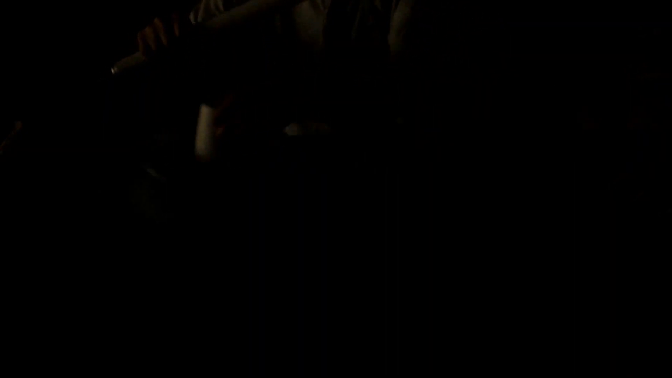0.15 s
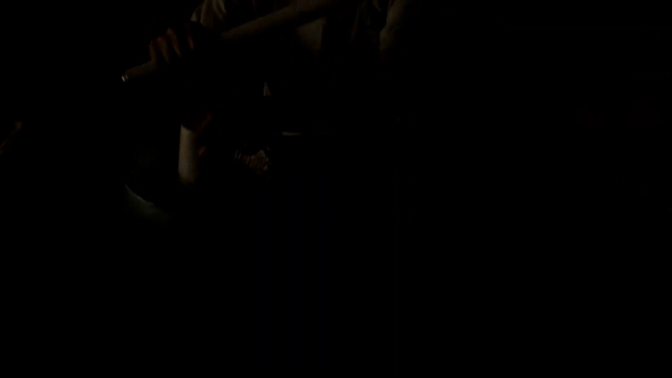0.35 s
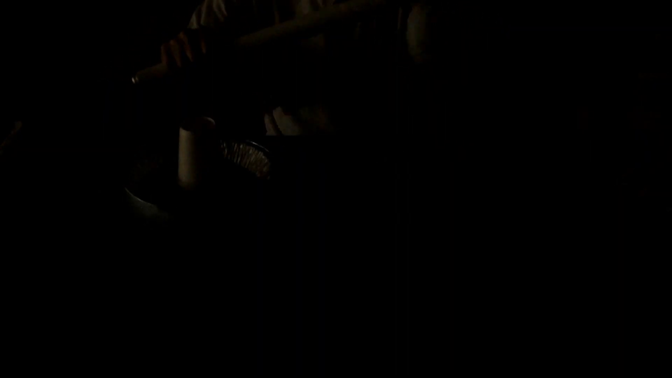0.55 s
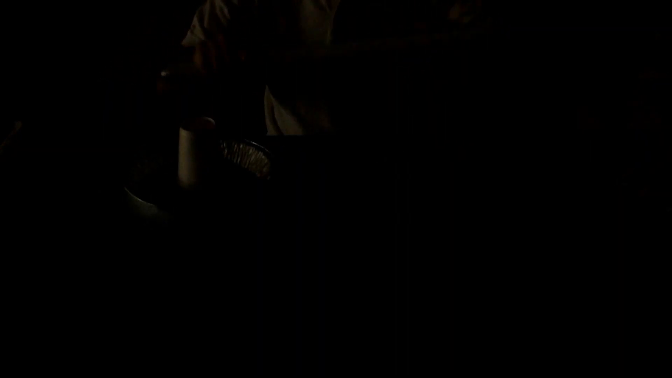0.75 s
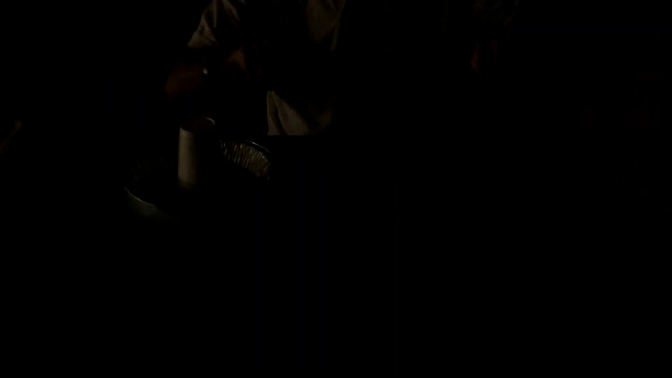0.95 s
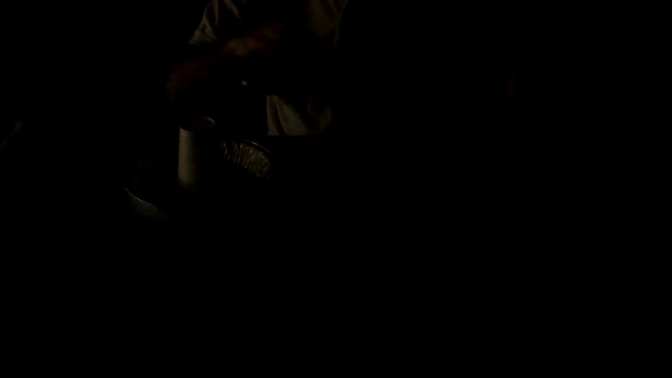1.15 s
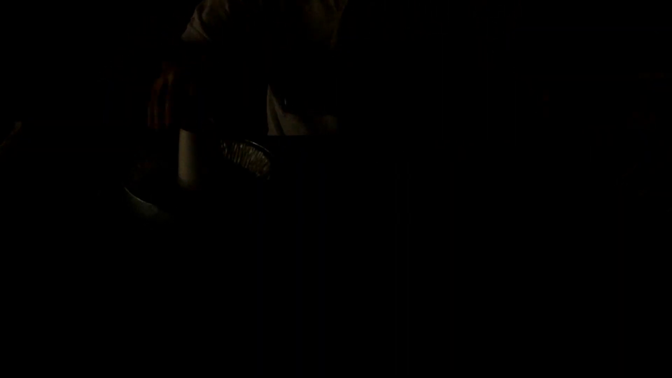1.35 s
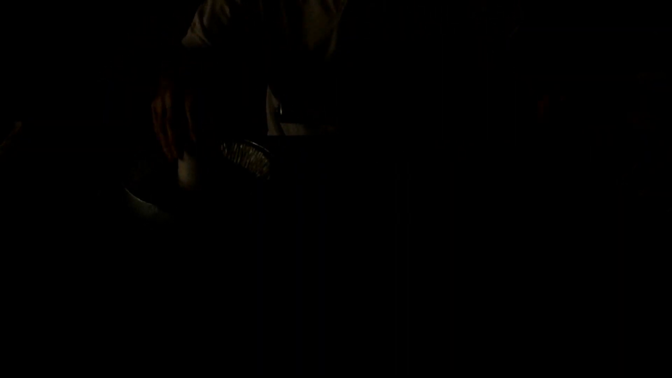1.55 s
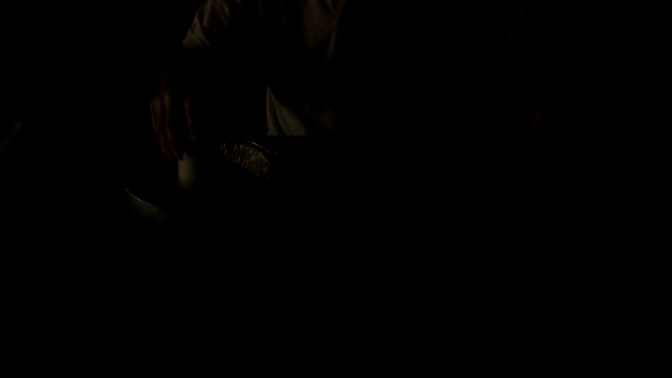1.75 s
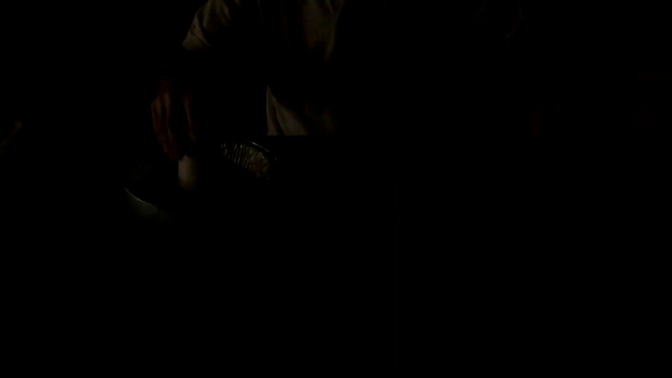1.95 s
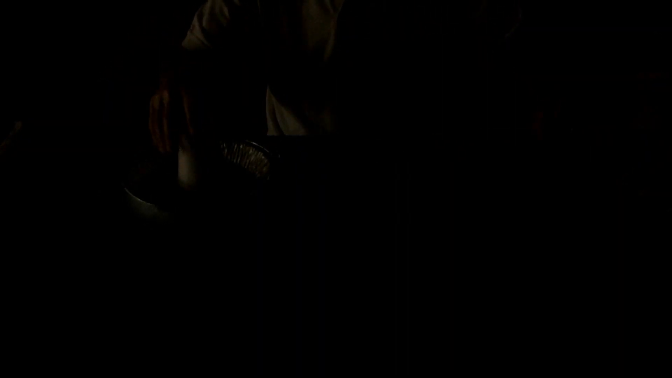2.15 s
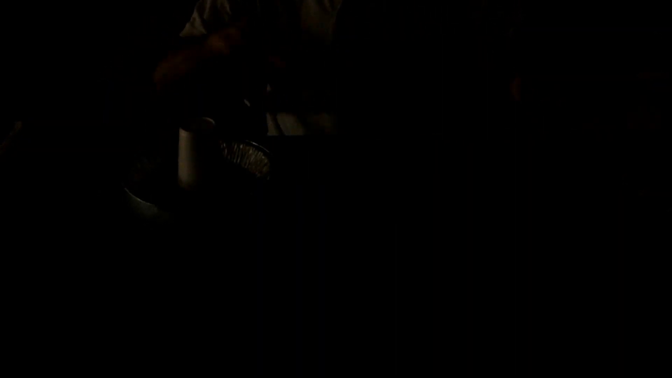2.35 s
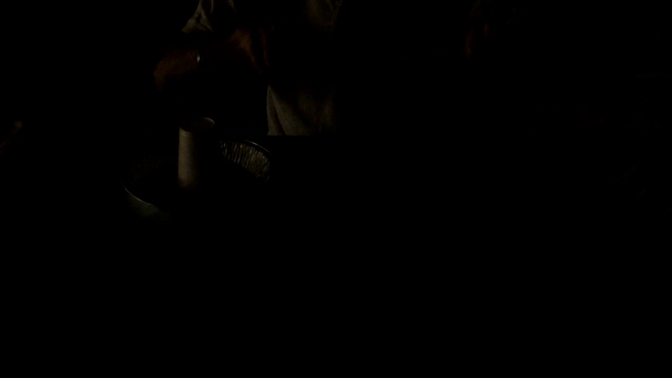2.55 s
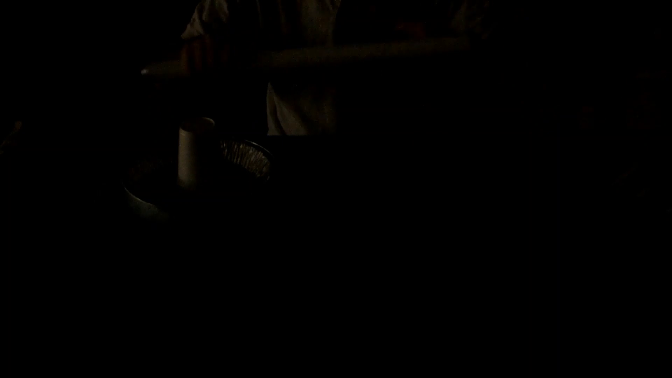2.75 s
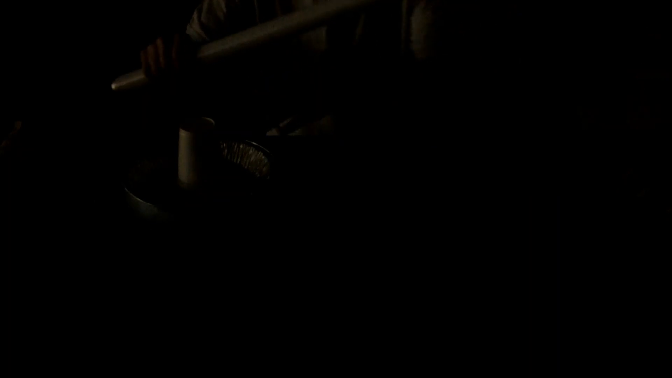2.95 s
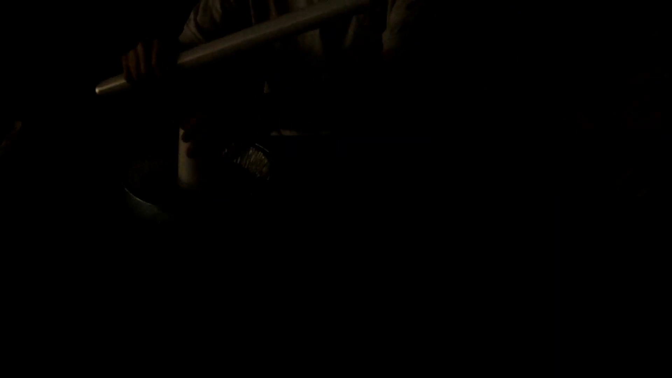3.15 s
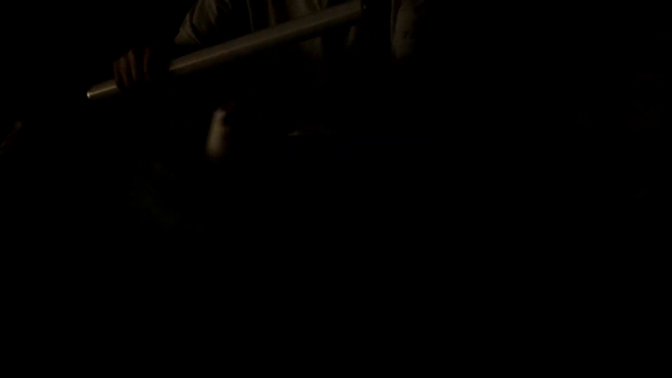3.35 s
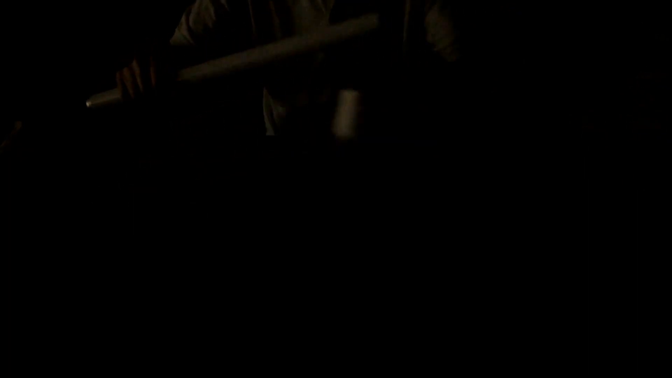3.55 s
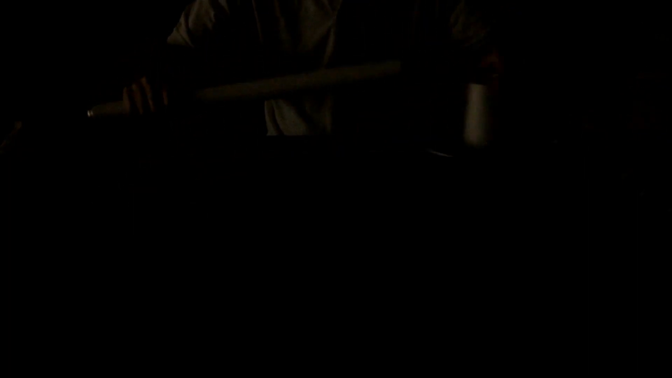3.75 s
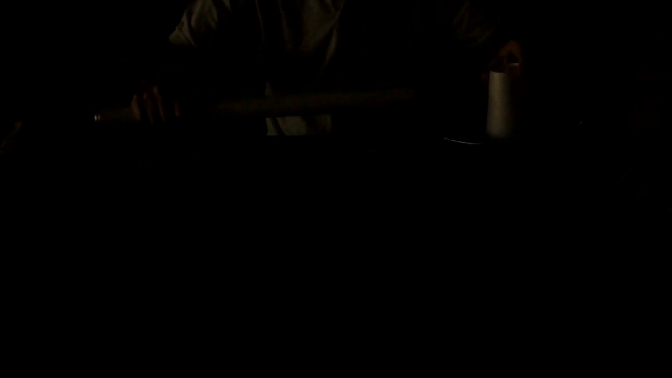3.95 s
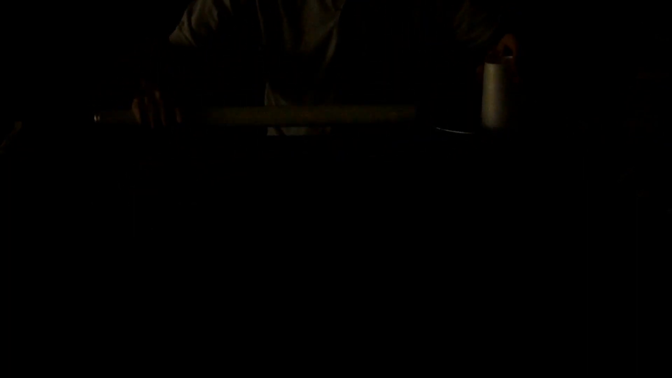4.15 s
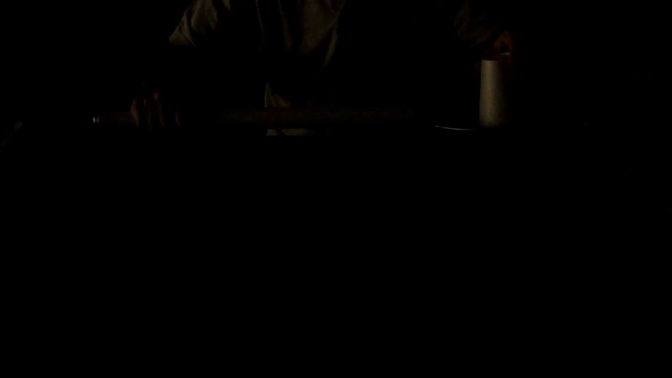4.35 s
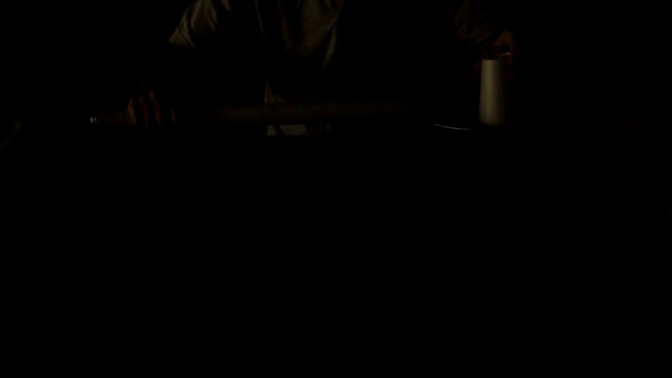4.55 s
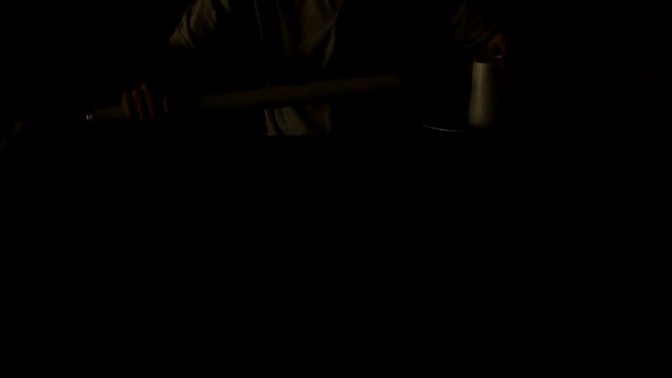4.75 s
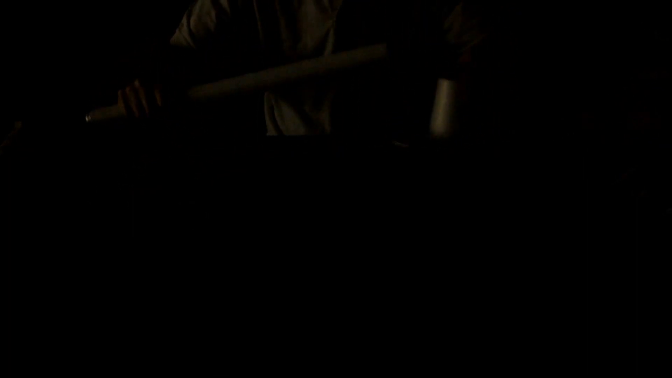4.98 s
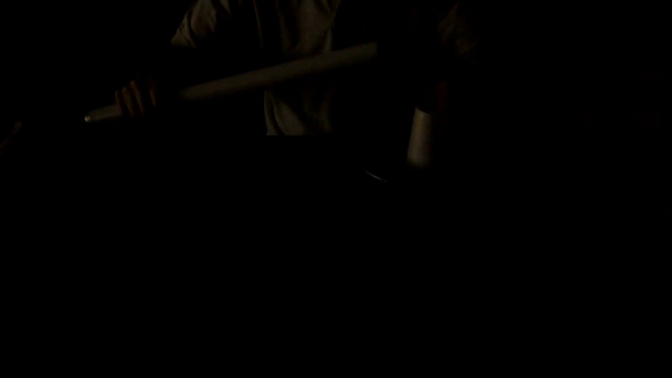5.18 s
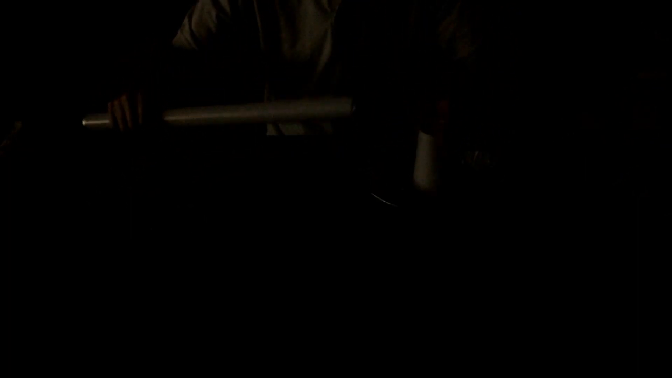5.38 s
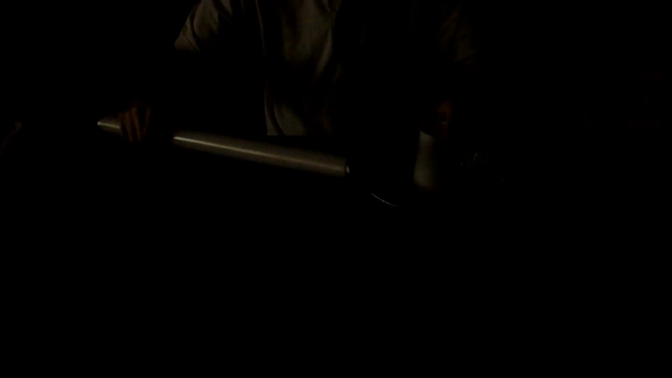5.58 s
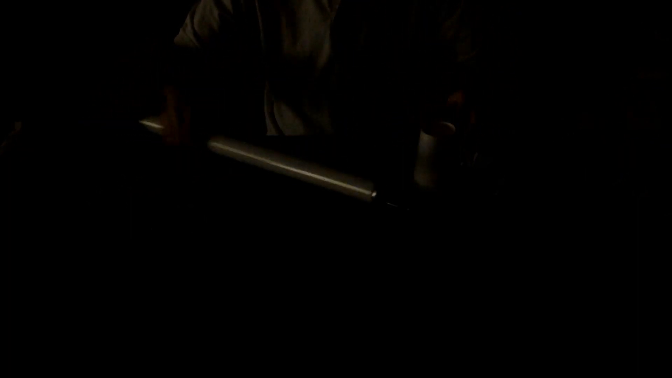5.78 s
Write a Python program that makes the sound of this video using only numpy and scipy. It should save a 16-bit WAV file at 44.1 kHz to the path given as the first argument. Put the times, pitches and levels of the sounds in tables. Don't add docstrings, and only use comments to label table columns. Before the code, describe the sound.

A glass tube taps and slides on a thin metal pan, giving bright spark clicks, faint squeaks and short clanks over soft hum.

```python
import sys
import numpy as np
from scipy import signal
from scipy.fft import rfft, irfft
from scipy.io import wavfile
from scipy.ndimage import uniform_filter1d

SR = 44100
rng = np.random.default_rng(int(sys.argv[2]) if len(sys.argv) > 2 else 0)


def how_loud(loudness_db):
    steps = np.asarray(loudness_db, float) / 20
    return 10 ** steps


def file_out(sig):
    cols = np.atleast_2d(sig).T
    lim = np.clip(cols, -1, 1)
    pcm = np.round(lim * 32767).astype(np.int16)
    wavfile.write(sys.argv[1], SR, pcm)


N = 256573

# start in seconds, snap peak in dB, low edge in Hz, high edge in Hz,
# glass clink in dB relative to the snap.
SPARKS = [
    (1.7988, -11, 9000, 16500, -15.5),
    (3.2491, -13, 4180, 11600, -7),
    (4.133, -13.5, 7950, 15700, -16),
    (5.5116, -24, 6360, 13200, -9.5),
]


def evened(x):
    return x / np.sqrt(np.mean(x ** 2) + 1e-20)


def read(points, hz):
    f, value = np.transpose(points)
    return np.interp(np.log(hz + 1), np.log(f + 1), value)


def add(mix, s, sound):
    part = mix[round(s * SR):][:len(sound)]
    part += sound[:len(part)]


def band(x, low_hz, high_hz):
    sos = signal.butter(2, [low_hz, high_hz], "bandpass", fs=SR, output="sos")
    y = signal.sosfilt(sos, x)
    return y / abs(y).max()


def resonate(x, hz, width_hz):
    pole = np.exp((2j * np.pi * hz - np.pi * width_hz) / SR)
    return 2 * signal.lfilter([1 - abs(pole)], [1, -pole], x).real


def stroke(t, start, length, rise, fade_db_per_s):
    since_end = np.maximum(t - start - length, 0)
    return np.clip((t - start) / rise, 0, 1) * how_loud(-fade_db_per_s * since_end)


def pair(frames, size, likeness):
    hz = np.fft.rfftfreq(size, 1 / SR)
    a, b, c, d = rng.standard_normal((frames, len(hz), 4)).T
    apart = np.arccos(np.clip(read(likeness, hz), 0, 1))[:, None] / 2
    mid = np.cos(apart) * (a + 1j * b)
    side = np.sin(apart) * (c + 1j * d)
    return hz, np.array([mid + side, mid - side])


def floor():
    # frequency in Hz, level in dB per Hz.
    floor_colour = [(12, -49), (30, -17), (53, 0), (84, -17), (121, -3.5), (174, -9.5), (194, -7),
                    (409, -13), (511, -7), (571, -8), (1050, -13.5), (1140, -14), (3650, -20), (15000, -25)]
    # frequency in Hz, gain in dB.
    hiss_edge = [(14950, 0), (15250, -9), (15550, 0), (15900, 0), (16000, -50)]
    # frequency in Hz, likeness from 0 to 1.
    floor_likeness = [(40, 1), (180, 0.59), (550, 0.44), (1650, 0.25), (4970, 0.022), (15000, 0.0073)]
    # frequency in Hz, rms level in dB.
    hum_tones = [(119, -76.5), (168, -77)]
    hz, z = pair(N // 512 + 6, 2048, floor_likeness)
    last_hz = floor_colour[-2][0]
    colour_db = read(floor_colour, np.minimum(hz, last_hz)) + read(hiss_edge, hz)
    hiss = signal.istft(z * how_loud(colour_db)[:, None], nperseg=2048, noverlap=1536)[1]
    hiss = hiss[:, 1024:N + 1024]
    t = np.arange(N) / SR
    drift = 30 * uniform_filter1d(rng.standard_normal((len(hum_tones), N)), 4000).cumsum(1) / SR
    hum = sum(np.sqrt(2) * how_loud(db) * np.sin(2 * np.pi * (f * t + d))
              for (f, db), d in zip(hum_tones, drift))
    return how_loud(-61.5) * evened(hiss) + hum


def room(x):
    # delay in ms, level in dB.
    early_echoes = [(2.2, -12), (4.6, -4), (9.8, -15), (15, -14), (20, -18)]
    # frequency in Hz, time to fall by 60 dB in seconds.
    ring_times = [(250, 0.78), (700, 0.48), (1800, 0.35), (4600, 0.27), (12000, 0.21)]
    # frequency in Hz, likeness from 0 to 1.
    tail_likeness = [(300, 0.94), (1500, 1), (4000, 0.87), (8000, 0.5), (15000, .05)]
    hz, z = pair(360, 256, tail_likeness)
    t = np.arange(360) * 64 / SR
    fade = how_loud(-60 * t / read(ring_times, hz)[:, None])
    tail = signal.istft(z * fade, nperseg=256, noverlap=192)[1]
    tail *= 1 - np.exp(-np.arange(tail.shape[1]) / (0.002 * SR))
    tail = signal.lfilter(*signal.butter(1, 600, "highpass", fs=SR), tail)
    tail *= how_loud(-3) / np.linalg.norm(tail[0])

    smear = np.exp(-np.arange(40) / 14.)
    chance = rng.standard_normal((len(early_echoes), 3, 40))
    for (ms, db), (common, left, right) in zip(early_echoes, chance):
        for ear, own in zip(tail, (left, right)):
            echo = (np.gradient(common) + .25 * common + .9 * np.gradient(own)) * smear
            z = rfft(echo, 64)
            echo = irfft(z / abs(z) * np.linspace(.3, 1, len(z)))
            add(ear, ms / 1000, how_loud(db) * echo / np.linalg.norm(echo))

    lag = 0.18
    tail[:, :3] += [[-lag, 1, lag], [lag, 1, -lag]]
    return signal.fftconvolve(x[None], tail, axes=1)[:, :N]


def rubs():
    # frequency in Hz, level in dB per Hz.
    friction = [(500, -40), (900, -24), (1600, -16), (3000, -11.5), (6000, -15), (10000, -16.5),
                (14500, -18), (17000, -15)]
    # frequency in Hz, width in Hz, level in dB.
    glass = [(7950, 120, -1), (12750, 130, 3.5)]
    # start in seconds, length in seconds, level in dB.
    slides = [(.85, .012, -60), (1.055, 0.047, -49), (1.09, .018, -54), (2.035, 0.059, -52.5),
              (2.467, .045, -60.5), (2.57, .012, -57), (2.588, 0.043, -51), (4.42, 0.062, -52.5)]
    # start in seconds, length in seconds, level in dB.
    squeaks = [(1.058, .015, -61), (1.085, .025, -53.5), (1.124, .012, -65), (2.598, 0.012, -51.5),
               (2.619, 0.0075, -69), (4.425, 0.028, -66)]
    # start in seconds, length in seconds, level in dB.
    songs = [(.848, 0.011, -58), (1.113, 0.02, -55.5), (2.467, .05, -73), (2.61, 0.041, -56)]
    # start in seconds, length in seconds, level in dB.
    low_songs = [(1.144, .022, -65), (2.468, .03, -72), (2.642, .04, -58)]

    slips = rng.standard_normal(N) * how_loud(2 * np.minimum(rng.exponential(1, N), 5))
    hiss = evened(irfft(rfft(slips) * how_loud(read(friction, np.fft.rfftfreq(N, 1 / SR))), N))
    squeak_hz, squeak_width_hz = 2860, 430
    squeak = resonate(slips, squeak_hz, squeak_width_hz)
    squeak = evened(resonate(squeak, squeak_hz, squeak_width_hz))
    song = sum(how_loud(db) * evened(resonate(slips, hz, width_hz)) for hz, width_hz, db in glass)
    low_song = evened(resonate(slips, 4110, 40))

    out, t = np.zeros(N), np.arange(N) / SR
    kinds = ((slides, hiss, 552), (squeaks, squeak, 1500),
             (songs, song, 700), (low_songs, low_song, 500))
    for rows, sound, fade in kinds:
        out += sound * sum(how_loud(db - 8.5) * stroke(t, s, length, 0.0066, fade) for s, length, db in rows)
    return out


def drag():
    # start in seconds, length in seconds, rms level in dB.
    pushes = [
        (4.164, 0.031, -26.5),
        (4.254, 0.011, -44),
        (4.314, 0.012, -37.5),
        (4.334, .012, -44),
    ]
    t = np.arange(N) / SR
    level = np.max([how_loud(db) * stroke(t, s, length, 0.013, 388) for s, length, db in pushes], axis=0)
    since = np.min([np.where(t < s, 1, t - s) for s, *_ in pushes], axis=0)
    hz = 1039 - 450 * np.minimum(since, .08)
    noise = rng.standard_normal((2, len(t)))
    wobble, shake = evened(uniform_filter1d(uniform_filter1d(noise, 150), 150))
    wave = np.sin(2 * np.pi * np.cumsum(hz) / SR + .5 * wobble)
    return np.sqrt(2) * level * (1 + .22 * shake) * wave


def bends():
    # start in seconds, level in dB, frequency in Hz,
    # time to fall by 60 dB in seconds.
    struck = [(.39, -49.5, 997, 0.16), (1.442, -50, 600, .034), (1.455, -39.5, 470, .085),
              (1.454, -41, 646, .049), (1.454, -48, 831, .087), (1.83, -30.5, 515, 0.031),
              (1.831, -42.5, 1036, 0.09), (1.832, -42, 2055, 0.18), (1.91, -38.5, 463, 0.099),
              (1.917, -47.5, 1068, 0.32), (1.912, -46, 2040, 0.15), (2.103, -56, 464, .11),
              (3.187, -49.5, 446, 0.11), (3.26, -56, 1015, .17), (4.168, -30.5, 1304, 0.045),
              (5.396, -49, 252, .04), (5.396, -46.5, 633, 0.16), (5.395, -42.5, 398, 0.096),
              (5.634, -46, 488, 0.047), (5.78, -50, 660, 0.035)]
    # start in seconds, level in dB, frequency in Hz,
    # time to fall by 60 dB in seconds.
    pressed = [(.35, -45, 550, 0.057), (.36, -53.5, 227, 0.032), (.364, -43.5, 494, 0.23),
               (1.08, -60, 1610, .08), (1.96, -48.5, 476, 0.084), (2.04, -59, 5920, 0.1),
               (4.19, -41, 875, .076), (4.21, -35.5, 621.5, 0.31), (4.21, -70, 193, .3),
               (4.217, -49.5, 428, 0.5), (4.26, -49, 1385, 0.6), (4.44, -56.5, 2200, 0.28),
               (1.95, -60, 2480, .2), (2.075, -57, 2370, .15), (4.2, -33, 2520, 0.13),
               (5.396, -44, 983, 0.093)]
    # start in seconds, level in dB, frequency in Hz,
    # time to fall by 60 dB in seconds.
    clinks = [(1.83, -28.5, 5050, 0.031), (1.83, -27.5, 6600, 0.03), (3.253, -46, 4380, .2),
              (3.25, -49, 4660, 0.39), (3.255, -57, 3400, .2)]
    kinds = (struck, 2.8), (pressed, 9.2), (clinks, 1.2)
    out, t = np.zeros(N), np.arange(12000) / SR
    rows = [(*row, ms) for table, ms in kinds for row in table]
    chance = rng.standard_normal((len(rows), 2, len(t)))
    for (s, db, hz, t60, ms), luck in zip(rows, chance):
        span = int(5 * SR / hz) + 30
        smooth = uniform_filter1d(uniform_filter1d(luck, span), span)
        wobble, shake = smooth * np.sqrt(1.5 * span)
        swell = np.sin(np.pi / 2 * np.minimum(t * 1000 / ms, 1))
        shape = swell * how_loud(-60 * np.maximum(t - ms / 1000, 0) / t60)
        ring = (1 + .55 * shake) * np.sin(2 * np.pi * hz * t + .9 * wobble)
        add(out, s, how_loud(db) * evened(shape * ring) * np.sqrt(np.mean(shape ** 2) / 2))
    return out


def contacts():
    # start in seconds, crack in dB, then pan rattle in dB
    # and bench thud in dB, both relative to the crack.
    ticks = [(.3382, -38, -19.5, -6), (.853, -47, -23, -18), (1.4416, -57, -2, 20),
             (1.4533, -26.5, -26, -5), (1.9586, -26.5, -19, -9), (3.1922, -40, -13.5, 2),
             (4.5947, -50.5, -10, 4), (5.5035, -44, -24, -13), (5.6337, -34.5, -20, -4.5),
             (5.7793, -29, -33, -12)]
    # start in seconds, crack in dB, relative rattle in dB,
    # relative thud in dB.
    knocks = [(.3715, -45, -4, 12), (.3879, -28, -22.5, -16), (1.829, -20.5, -15.5, -11),
              (2.0742, -48.5, -3, 7), (3.235, -30, -21, -11), (3.2754, -46, -22, -9),
              (4.1658, -25, -2.5, -6), (4.1896, -20, -13.5, -10), (5.394, -29, -11.5, -1),
              (5.4013, -48, -21, 7.5)]
    # start in seconds, crack in dB, relative rattle in dB,
    # relative thud in dB.
    rattles = [(.3545, -41, -9.5, 6.5), (1.9093, -23.5, -15, -11), (2.1046, -40, -13.5, -9),
               (3.2274, -41, -27, -21), (4.2202, -21, -10.5, -14), (4.2253, -23.5, -39, -12),
               (4.2288, -20.5, -19.5, -11.5), (4.2375, -22.5, -20, -13.5), (4.2503, -35, -22, -4),
               (4.2844, -36, -16, 3.5), (4.3088, -38.5, -2.5, -19), (4.3241, -28.5, -13.5, -6.5),
               (4.3454, -41.5, -8, -10), (4.4513, -54, 0.5, -6), (5.6095, -39, -13.5, -6),
               (5.6154, -41, -20, -11)]
    kinds = (ticks, 1, -1), (knocks, 3.75, -2), (rattles, 1.8, -43)
    crackle_db = -8.5
    jolts = [(s, db + crackle_db, 0.85, clink_db - crackle_db, -33.5, -20)
             for s, db, *_, clink_db in SPARKS]
    for rows, ms, clink_db in kinds:
        jolts += [(s, db, ms, clink_db, *rest) for s, db, *rest in rows]
    return jolts


def clicks():
    # frequency in Hz, level in dB, time to fall by 60 dB in seconds.
    pan = [(1897, 12, 0.029), (2037, 6.5, 0.12), (2055, 7.5, 0.058), (2200, 10.5, 0.067), (2320, -11, 0.05),
           (2480, 17, 0.039), (2630, -16.5, 0.04), (2600, 10, 0.022), (2897, 5, 0.069), (3010, 16, 0.036),
           (3240, 1, 0.081), (4050, -40, 0.027), (4590, 17, 0.022), (5490, 0, 0.053), (6300, -3, 0.034),
           (8680, 8, 0.11), (8400, -18, 0.037)]
    out, t, rows = np.zeros(N), np.arange(8000) / SR, contacts()
    chance = rng.standard_normal((len(rows), 8000 + 2 * len(pan)))
    for (s, db, ms, clink_db, rattle_db, thud_db), luck in zip(rows, chance):
        noise, length = luck[:8000], max(ms, .05) / 1000
        crack = band(noise * np.exp(-t / length) * (1 - np.exp(-t * 9000)), 5800, 17500)
        clink = band(noise * np.exp(-t / (length + 0.002)), 3300, 8120)
        thud = band(noise * np.exp(-t / 0.017) * (1 - np.exp(-t / 0.001)), 183, 876)
        spot = luck[8000:].reshape(-1, 2)
        ring = sum(how_loud(level_db + 2.8 * g - 60 * t / t60)
                   * np.sin(2 * np.pi * f * (1 + 0.0144 * d) * t + 3 * g)
                   for (f, level_db, t60), (g, d) in zip(pan, spot))
        ring *= (1 - np.exp(-t / 0.00021)) / np.sqrt(len(pan))
        blur = band(noise[::-1] * np.exp(-t / 0.015) * (1 - np.exp(-t / 0.003)), 1160, 3600)
        rattle = .5 * ring + 0.99 * blur
        jolt = crack + how_loud(clink_db - 3.0) * clink
        jolt += how_loud(rattle_db - 1.0) * rattle + how_loud(thud_db - 11.0) * thud
        add(out, s + .0008, how_loud(db) * jolt)
    return out


def sparks():
    # start in seconds, snap peak in dB, low edge in Hz, high edge
    # in Hz.
    pops = [
        (.3935, -25, 7000, 12800),
        (1.9095, -18.5, 4300, 8800),
        (3.1915, -37, 2500, 9000),
        (3.2354, -21, 2820, 11500),
        (5.7793, -24.5, 5000, 13300),
    ]
    out, jump = np.zeros(N), signal.unit_impulse(400)
    for rows, body_db in ((SPARKS, -20.5), (pops, -8)):
        for s, db, low_hz, high_hz, *_ in rows:
            snap = band(jump, low_hz, high_hz)
            skirt = band(jump, 200, low_hz)
            add(out, s + .0008, how_loud(db) * (snap + how_loud(body_db) * skirt))
    return out


def scene():
    rings = drag() + bends()
    return room(sparks() + clicks() + rubs() + 0.45 * rings) + 0.41 * rings + floor()


def low_pass(x):
    return signal.sosfilt(signal.butter(12, 16820, fs=SR, output="sos"), x)


def record(dry):
    # frequency in Hz, gain in dB.
    treble_fade = [(14700, 1), (15300, -10), (15900, -15), (16400, -44), (17000, -47)]
    hz = np.fft.rfftfreq(N, 1 / SR)
    heard = irfft(rfft(dry) * how_loud(read(treble_fade, hz)), N)
    left_db = 0.66
    return low_pass(heard * how_loud(np.array([[left_db / 2], [-left_db / 2]])))


dry = scene()
out = record(dry)
file_out(out)
```